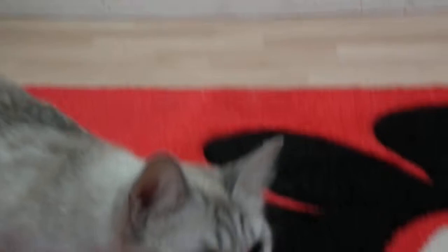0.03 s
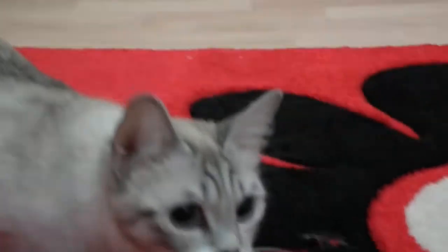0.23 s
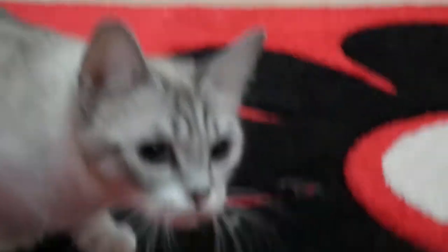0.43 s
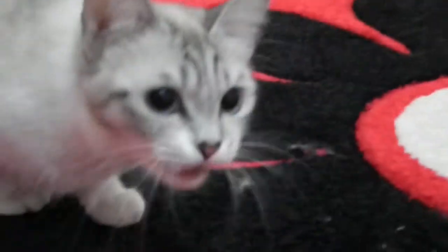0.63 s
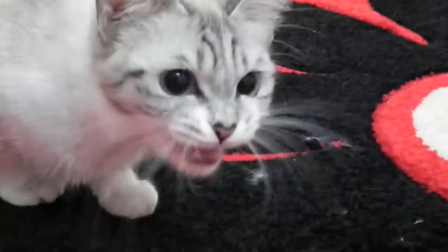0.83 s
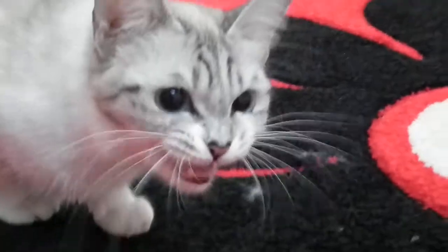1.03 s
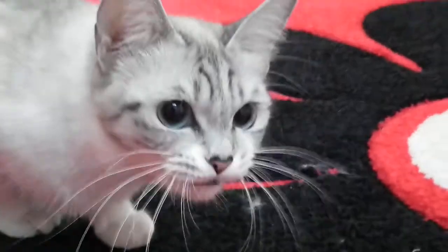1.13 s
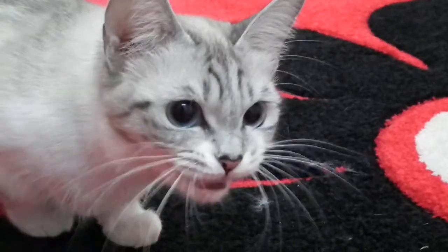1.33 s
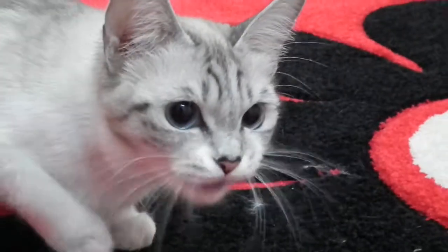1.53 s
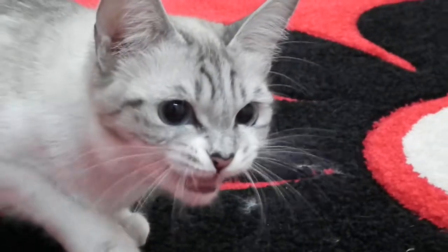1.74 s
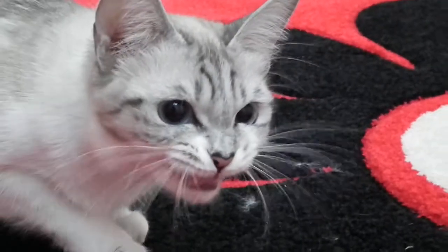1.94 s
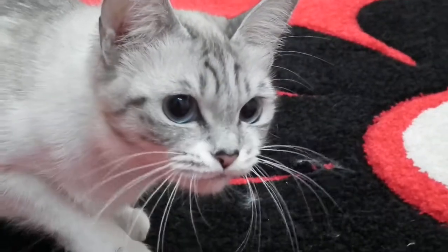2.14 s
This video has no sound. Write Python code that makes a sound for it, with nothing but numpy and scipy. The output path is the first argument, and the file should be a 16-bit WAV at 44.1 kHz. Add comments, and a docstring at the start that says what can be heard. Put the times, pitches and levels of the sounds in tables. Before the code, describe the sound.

A cat chatters with short wet mouth clicks and tiny squeaky chirps in a quiet room.

```python
"""A cat chatters on a rug in a quiet room, close to a hand-held camera.
Its jaw snaps in wet clicks that ring the mouth; some cut off a short squeaky chirp.
Soft puffs of air and one thin falling hiss follow the snaps, among dull shuffles on the rug.
The hand knocks and scuffs the camera body; under it all lie room rumble, hiss, an appliance hum
and faint electrical pips."""
import sys
import numpy as np
from scipy import signal
from scipy.fft import rfft, irfft
from scipy.io import wavfile
from scipy.ndimage import uniform_filter1d

SR = 44100
rng = np.random.default_rng(int(sys.argv[2]) if len(sys.argv) > 2 else 0)


def pcm_store(signal):
    """Save signal as 16-bit PCM."""
    levels = np.round(np.clip(np.atleast_2d(signal), -1, 1) * 32767)
    wavfile.write(sys.argv[1], SR, levels.astype(np.int16).T)


N = 97020
TIME_S = np.arange(N) / SR


def amp(db):
    """Decibels to gain."""
    return 10 ** (np.asarray(db) / 20)


def unit(x):
    """Scales to rms 1."""
    return x / np.sqrt(np.mean(x ** 2) + 1e-20)


def burst(x):
    """Gives a short sound the energy of five milliseconds at rms 1."""
    return x / np.sqrt(np.mean(np.sum(x ** 2, -1)) / (.005 * SR))


def curve_at(points, hz, column=1):
    """Reads a curve on a log-frequency axis."""
    table = np.array(points)
    return np.interp(np.log(hz + 1), np.log(table[:, 0]), table[:, column])


def pan(db):
    """Left and right gains; positive leans left."""
    return amp(np.array([[db], [-db]]) / 2)


def add(mix, start_s, sound):
    """Mixes a sound in at its cue."""
    part = mix[:, max(round(start_s * SR), 0):][:, :sound.shape[-1]]
    part += sound[..., :part.shape[1]]


def colour(x, db_at):
    """Minimum-phase EQ with the given dB curve."""
    size = 2048
    log_gain = np.log(amp(db_at(abs(np.fft.fftfreq(size, 1 / SR)) + 1)))
    ring = np.fft.ifft(np.exp(np.conj(signal.hilbert(log_gain)))).real
    return signal.fftconvolve(x, ring[:size // 2])


def tilt(hz, db_per_octave):
    """Brightens or dulls above the main mouth resonance."""
    return db_per_octave * np.log2(np.maximum(hz / 2300, 1))


def drift(count, rate_hz):
    """Smooth random wander of about rms 1."""
    lowpass = np.exp(-(np.fft.rfftfreq(N, 1 / SR) / rate_hz) ** 2)
    return unit(irfft(rfft(rng.standard_normal(N)) * lowpass, N))[:count]


# fader ride on the room's rumble: time_s, gain_db
RUMBLE_RIDE = [(0, -2), (1.0, 0.5), (1.9, 0.5), (2.02, -16), (2.2, 2)]
def rumble_db(t, hz):
    """The lows under 110 Hz dip briefly near the end."""
    return (hz < 110) * np.interp(t, *np.transpose(RUMBLE_RIDE))


# room tone EQ: freq_hz, gain_db
ROOM_EQ = [(20, 3.5), (42, -8), (65, -7), (105, 10.5), (150, -3.5), (230, 7.5), (320, 0.5), (480, -2),
           (750, -5.5), (1200, -7), (2200, -8.5), (2750, -11.5), (3250, -8), (4000, -12.5), (6000, -12.5),
           (7200, -17), (10000, -22), (12500, -24), (14500, -22.5), (16000, -44.5)]
# fader ride on the room's treble: time_s, gain_db
TREBLE_RIDE = [(0, 1.5), (.4, 2.5), (.5, -0.5), (.7, 2.5), (.82, -2), (1.4, -1), (1.8, -3.5), (2.2, -2.5)]
# how alike left and right are: freq_hz, correlation
ROOM_LIKENESS = [(30, .92), (120, 0.78), (300, 0.65), (700, 0.2), (2000, 0.13), (6000, 0.0333),
                 (14000, 0.057)]
def room_tone():
    """A bed of centred rumble and wide hiss with drifting patches."""
    size, hop = 1024, 256
    hz = np.fft.rfftfreq(size, 1 / SR)[:, None]
    t = np.arange(N // hop + 5) * hop / SR
    left_re, left_im, own_re, own_im, patches = rng.standard_normal((len(t), len(hz), 5)).T
    patch_db = 1.5 * unit(uniform_filter1d(uniform_filter1d(patches, size=12, axis=0), size=12, axis=1))
    likeness = curve_at(ROOM_LIKENESS, hz)
    left = left_re + 1j * left_im
    right = likeness * left + np.sqrt(1 - likeness ** 2) * (own_re + 1j * own_im)
    treble_db = np.minimum(hz / 2000, 1) * np.interp(t, *np.transpose(TREBLE_RIDE))
    gain = amp(curve_at(ROOM_EQ, hz) + patch_db + treble_db + rumble_db(t, hz))
    noise = signal.istft(np.array([left, right]) * gain, nperseg=size, noverlap=size - hop)[1][:, :N]
    return amp(-50) * pan(db=0.66) * unit(noise)


# drone of the appliance: pitch_hz, level_db, pan_db
HUM_TONES = [(26.4, -65.5, 9.5), (118.3, -63.5, 2.5), (209.4, -66, 7), (360.7, -62, 2), (597, -65, -8.5)]
def appliance_hum():
    """Wavering tones of a distant appliance; the lowest follows the rumble."""
    hum = np.zeros((2, N))
    for hz, level_db, pan_db in HUM_TONES:
        swell = 1 + 0.1 * drift(N, rate_hz=2.6)
        tone = np.sin(2 * np.pi * hz * TIME_S + 0.1 * drift(N, rate_hz=12))
        hum += pan(pan_db) * amp(level_db + rumble_db(TIME_S, hz)) * unit(swell * tone)
    return hum


def electrical_pips():
    """Faint, very high interference in regular bursts."""
    start_s, period_s, length_s, pitch_hz = .0352, .21408, .0127, 13970
    gate = uniform_filter1d(((TIME_S - start_s) % period_s < length_s) * 1., size=44)
    return amp(-46.5) * pan(db=5) * gate * np.sin(2 * np.pi * pitch_hz * TIME_S)


def room_echo(x, t60_s=0.21):
    """Sparse reflections make the short, weak tail of a carpeted room."""
    t = np.arange(SR // 2) / SR
    taps = rng.standard_normal((2, len(t))) * (rng.random((2, len(t))) < .1)
    taps *= (t > .006) * amp(-60 * t / t60_s)
    return amp(-11) * signal.fftconvolve(x, taps / np.linalg.norm(taps[0]), axes=1)[:, :N]


# ring of the camera body: pitch_hz, gain_db, t60_s, pan_db
CAMERA_MODES = [(780, -1, 0.025, 4), (1623, 8.5, 0.019, -10.5), (2034, 9.5, 0.017, -2.5),
                (2650, 13, 0.0028, 6), (3232, 5.5, 0.013, 7), (3728, 6, 0.017, 5), (4210, 5.5, 0.0094, 8),
                (4950, 8, 0.01, 8), (7250, -5.5, 0.014, 14), (9850, -1.5, .006, 0)]
# handling hits: start_s, level_db, centre_hz, width_octaves, scuff_decay_s, pan_db
CAMERA_KNOCKS = [(0.071, -20, 2740, 1.1, 0.00037, -0.5), (0.099, -45, 4550, 0.85, 0.005, -1),
                 (0.279, -47.5, 2000, 1, 0.0043, 4), (0.313, -36.5, 1810, 1.2, 0.0043, 1.5),
                 (0.3178, -40, 1690, 0.41, .003, 11), (0.3209, -30.5, 1530, .9, 0.0035, -2.5),
                 (0.3446, -34.5, 1590, 0.45, 0.0026, -2.5), (0.4388, -43.5, 3500, 2.6, 0.0062, 3),
                 (.591, -39.5, 3000, 1.53, 0.01, 10), (.599, -36, 2670, 0.34, 0.012, 3),
                 (0.6037, -27.5, 2920, 0.17, 0.00046, -9.5), (0.6265, -37.5, 2530, 0.2, 0.00089, -5),
                 (1.029, -47, 3000, 0.91, 0.0049, 6), (1.209, -42.5, 3620, 0.37, 0.003, -1),
                 (1.405, -43, 3560, 0.22, 0.0027, -1), (1.7374, -43, 5960, 1.23, .001, 4),
                 (1.7379, -36, 3260, 0.32, 0.0019, 2)]
def camera_knock(level_db, centre_hz, width_octaves, scuff_decay_s, pan_db):
    """A tap and a gritty scuff ring the camera body; the place touched decides which modes speak."""
    t = np.arange(SR // 20) / SR
    rings = sum(pan(side_db) * amp(db - 60 * t / t60_s) * np.sin(2 * np.pi * hz * t) * (-1) ** k
                for k, (hz, db, t60_s, side_db) in enumerate(CAMERA_MODES))
    own, shared = rng.standard_normal((2, len(t))), rng.standard_normal(len(t))
    force = 23.75 * scuff_decay_s * (shared + 1.57 * own) * np.exp(-t / scuff_decay_s)
    force[:, 0] += 1  # the tap
    bell = lambda hz: np.exp(-.5 * (np.log2(hz / centre_hz) / width_octaves) ** 2)
    focus_db = lambda hz: 20 * np.log10(bell(hz) + amp(-37.5))
    knock = [colour(signal.fftconvolve(push, ring), focus_db) for push, ring in zip(force, rings)]
    return amp(level_db) * pan(pan_db) * burst(np.array(knock))


# soft moves on the rug: start_s, length_s, level_db, centre_hz, width_octaves
RUG_SHUFFLES = [(.30, 0.063, -49.5, 216, 0.39), (.310, .025, -39.5, 895, 0.6),
                (.433, 0.021, -44, 740, 0.24), (.61, 0.032, -49, 774, 0.65),
                (0.699, 0.028, -50.5, 710, 0.37), (0.887, 0.077, -58, 606, 0.47),
                (1.11, 0.037, -48, 595, 0.43), (1.139, 0.088, -50.5, 600, 0.32),
                (1.303, 0.02, -47.5, 910, 0.22), (1.459, 0.13, -53.5, 600, 0.53)]
def rug_shuffle(length_s, level_db, centre_hz, width_octaves):
    """A dull brush of fur or cloth that swells and fades."""
    count = round(length_s * SR)
    shared, own = rng.standard_normal(count), rng.standard_normal((2, count))
    swell = np.sin(np.pi * np.arange(count) / count)
    band_db = lambda hz: np.maximum(-4 * (np.log2(hz / centre_hz) / width_octaves) ** 2, -60)
    rub = np.array([colour(noise * swell, band_db) for noise in shared + 0.59 * own])
    return amp(level_db) * rub * np.sqrt(count) / np.linalg.norm(rub)


# sweep of the thin hiss after one snap: time_s, centre_hz, level_db
HISS_SWEEP = [(1.47, 4700, -56), (1.51, 4450, -50.5), (1.56, 4150, -45), (1.60, 3870, -46.5),
              (1.66, 3780, -53), (1.71, 3830, -57)]
def falling_hiss(width_hz=700):
    """Air in one narrow resonance that slides down."""
    time_s, centre_hz, level_db = np.transpose(HISS_SWEEP)
    sweep = np.exp(2j * np.pi * np.cumsum(np.interp(TIME_S, time_s, centre_hz)) / SR)
    pole = np.exp(-np.pi * width_hz / SR)
    shared, own = rng.standard_normal(N), rng.standard_normal((2, N))
    air = (shared + 1.9 * own) * amp(0.93 * drift(N, rate_hz=200))
    band = sweep * signal.lfilter([1], [1, -2 * pole, pole ** 2], air / sweep)
    gate = (TIME_S > time_s[0]) & (TIME_S < time_s[-1])
    return pan(db=5) * unit(band.real) * amp(np.interp(TIME_S, time_s, level_db)) * gate


# EQ of breath in the open mouth: freq_hz, gain_db
BREATH_EQ = [(250, -9.5), (720, 7), (1100, -7), (1600, -1), (2250, 6.5), (3300, 5.5), (3900, 1.5),
             (4450, 2.5), (5600, -13), (6900, 3), (8000, -29), (10000, -18), (15000, -35)]
# breaths around the snaps: start_s, rise_s, decay_s, level_db, tilt_db_per_octave
AIR_PUFFS = [(.715, 0.023, .025, -50, -2), (.815, .005, 0.0035, -47.5, 3), (.872, 0.0077, 0.034, -42, -0.5),
             (1.0, .012, 0.015, -50.5, -1), (1.108, 0.014, 0.02, -42, 0), (1.217, 0.014, .008, -45.5, -2.5),
             (1.273, 0.017, 0.018, -44.5, -0.5), (1.41, 0.0038, 0.008, -48, 0),
             (1.462, .012, 0.046, -44.5, 0), (1.636, .015, 0.014, -48, 1), (1.702, .02, 0.018, -45.5, 2),
             (1.825, 0.0056, 0.025, -52, -3), (1.935, 0.0087, 0.0085, -50.5, -2),
             (1.987, .005, 0.022, -42.5, -1), (2.114, 0.031, 0.027, -49.5, -13)]
def air_puff(rise_s, decay_s, level_db, treble_tilt, spread=0.39):
    """Air flutters through the mouth's resonances."""
    t = np.arange(SR // 4) / SR
    envelope = np.minimum(t / rise_s, 1) * np.exp(-np.maximum(t - rise_s, 0) / decay_s)
    flutter = amp(2.5 * unit(uniform_filter1d(rng.standard_normal(len(t)), size=150)))
    breath_db = lambda hz: curve_at(BREATH_EQ, hz) + tilt(hz, treble_tilt)
    mid, side = [unit(colour(noise, breath_db)[:len(t)]) for noise in rng.standard_normal((2, len(t)))]
    air = unit(np.array([mid + spread * side, mid - spread * side]))
    return amp(level_db) * pan(db=-1.5) * envelope * flutter * air


# formants of the throat: freq_hz, gain_db
THROAT_EQ = [(300, -17), (730, -11.5), (1050, -10), (1450, -33), (1850, -4), (2250, -3), (2900, -0.5),
             (3480, -4), (3850, -34), (4300, -4), (5000, -7), (5650, -8), (6100, -18), (7000, -22),
             (9000, -29), (15000, -36)]
# squeaks: start_s, length_s, level_db, pitch_hz, tilt_db_per_octave
CAT_CHIRPS = [(0.838, 0.042, -32, 763.5, -4.5), (1.090, 0.012, -33.5, 780, -20),
              (1.452, 0.0048, -36, 775, -6.5)]
def chirp(length_s, level_db, pitch_hz, treble_tilt):
    """The vocal folds squeak, sagging in pitch and breaking up the longer they sound."""
    rise_s, release_s, sag_s, breakup_s = 0.007, 0.005, .014, .032
    t = np.arange(0, length_s + 5 * release_s, 1 / SR)
    roughness = .26 + .4 * np.minimum(t / breakup_s, 1) ** 3
    sag = 1 - .085 * (1 - np.exp(-(t / sag_s) ** 2))
    jitter = 1 + .014 * drift(len(t), rate_hz=290)
    cycles = np.cumsum(pitch_hz * sag * jitter) / SR
    folds = unit(sum(np.cos(2 * np.pi * k * cycles) for k in range(1, 14)))
    folds *= 1 + .55 * roughness * np.cos(np.pi * cycles)  # strong and weak pulses alternate
    pulsed_air = unit((0.69 + np.exp(-(cycles % 1) / 0.2)) * rng.standard_normal(len(t)))
    envelope = np.minimum(t / rise_s, 1) * np.exp(-np.maximum(t - length_s, 0) / release_s)
    rasp = envelope * unit((1 - roughness) * folds + roughness * pulsed_air)
    voice = colour(rasp, lambda hz: curve_at(THROAT_EQ, hz) + tilt(hz, treble_tilt))
    return amp(level_db) * pan(db=-3.5) * voice * np.linalg.norm(envelope) / np.linalg.norm(voice)


# mouth resonances at each microphone port: freq_hz, left_db, right_db
MOUTH_EQ = [(150, -33, -30), (766, -17, -19.5), (1200, -24.5, -20), (1697, -25, -21), (2372, 0, 4.5),
            (2800, -9.5, -3.5), (3514, -7.5, -5.5), (3810, -35, -25), (4440, -6.5, -10.5), (4880, -10, -10),
            (5770, -41, -15.5), (6250, -8.5, -32), (7240, -12.5, -9), (7400, -13.5, -30.5),
            (9900, -41, -35.5), (14900, -53, -69)]
# snaps of the chatter: start_s, level_db, tuning_ratio, tilt_db_per_octave
JAW_CLICKS = [(0.8794, -25, 1.0, -1.5), (1.1028, -25, 0.97, -0.5), (1.2664, -28, 0.98, 0.5),
              (1.4586, -26, 0.95, 0.5), (1.8168, -35.5, 0.907, 1.5), (1.931, -31.5, 0.87, -2)]
def jaw_click(level_db, tuning_ratio, treble_tilt):
    """A wet snap rings the mouth cavity; the jaw's position moves only the low resonances."""
    rest_hz = lambda hz: hz / (1 + (tuning_ratio - 1) / (1 + (hz / 3500) ** 10))
    ports = [colour(np.ones(1), lambda hz: curve_at(MOUTH_EQ, rest_hz(hz), port) + tilt(hz, treble_tilt))
             for port in (1, 2)]
    return amp(level_db) * burst(np.array(ports))


def scene():
    """The cat with its room tail and dry camera knocks, over the room bed."""
    cat, handling = falling_hiss(), np.zeros((2, N))
    for cues, sound in [(JAW_CLICKS, jaw_click), (CAT_CHIRPS, chirp),
                        (AIR_PUFFS, air_puff), (RUG_SHUFFLES, rug_shuffle)]:
        for start_s, *settings in cues:
            add(cat, start_s, sound(*settings))
    for start_s, *settings in CAMERA_KNOCKS:
        add(handling, start_s, camera_knock(*settings))
    return cat + room_echo(cat) + handling + room_tone() + appliance_hum() + electrical_pips()


# notches in the recorder's treble: centre_hz, width_hz, gain_db
TREBLE_NOTCHES = [(7945, 312, -20.5), (8850, 374, -23), (11800, 260, -17)]
def record(dry):
    """The recorder opens after a moment, notches the treble and cuts the very top."""
    opened = dry * (TIME_S > .0355)
    notch_db = lambda hz: sum(db * np.exp(-((hz - centre_hz) / width_hz) ** 2)
                              for centre_hz, width_hz, db in TREBLE_NOTCHES)
    notched = np.array([colour(side, notch_db)[:N] for side in opened])
    lowpass = signal.firwin(511, cutoff=16300, window=("kaiser", 9), fs=SR)
    return signal.oaconvolve(notched, lowpass[None], "same")


dry = scene()
out = record(dry)
pcm_store(out)
```